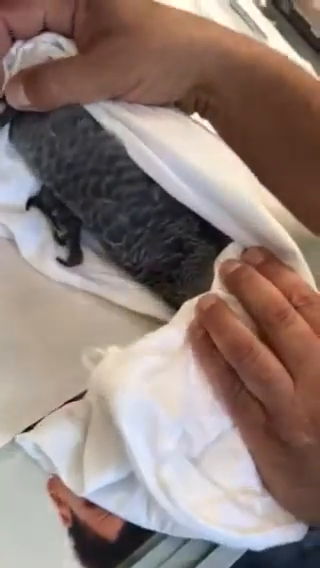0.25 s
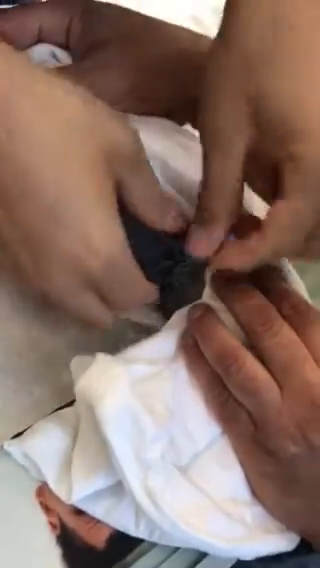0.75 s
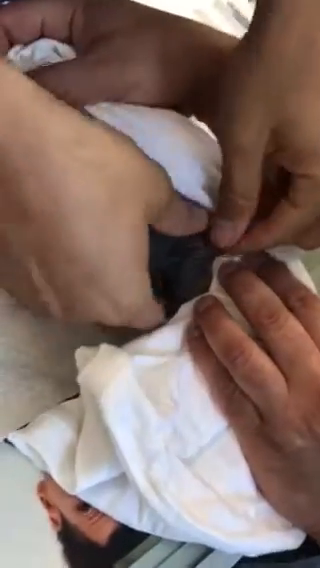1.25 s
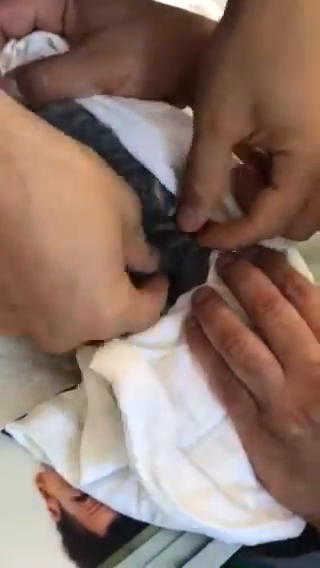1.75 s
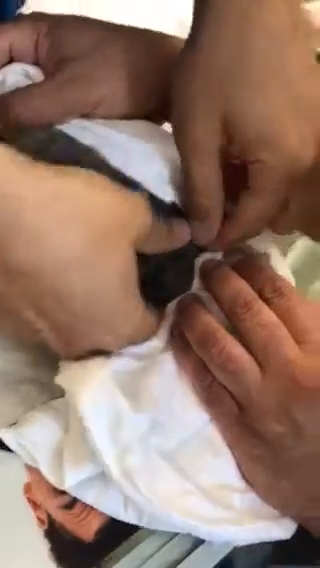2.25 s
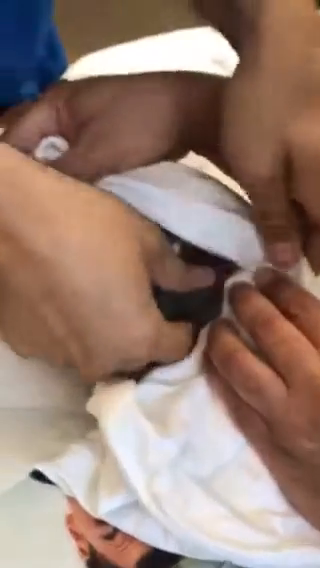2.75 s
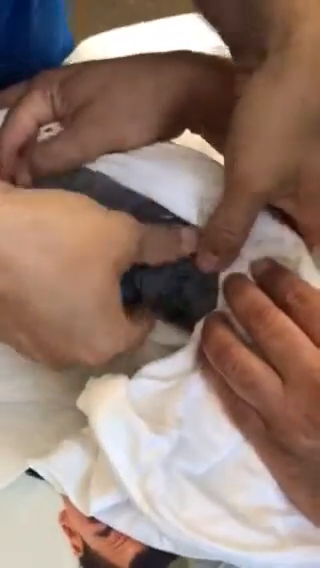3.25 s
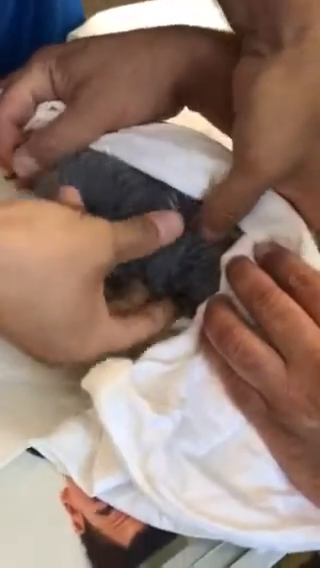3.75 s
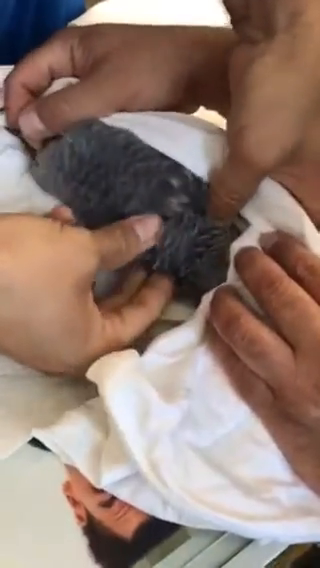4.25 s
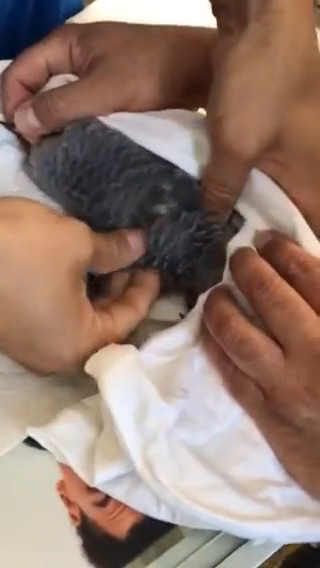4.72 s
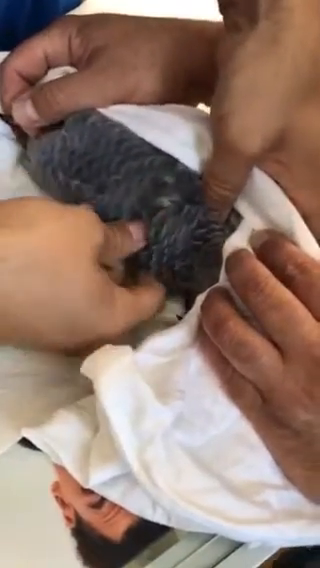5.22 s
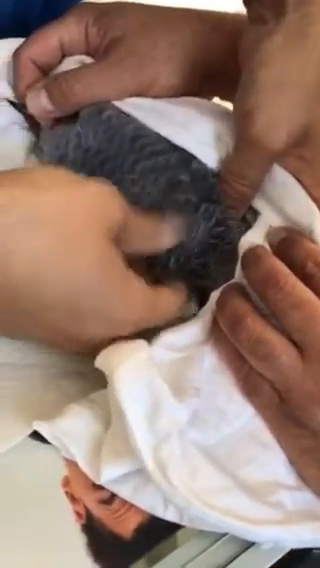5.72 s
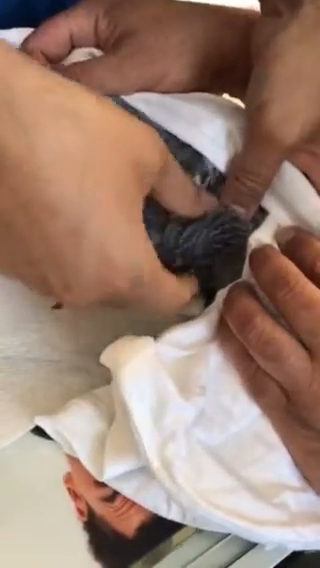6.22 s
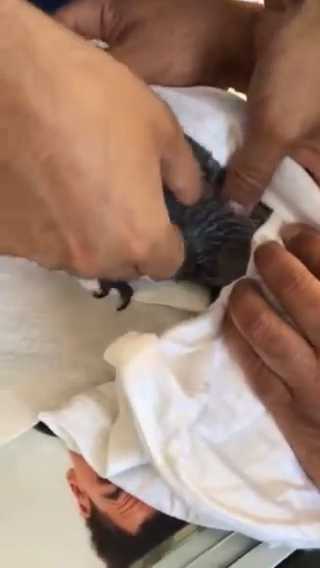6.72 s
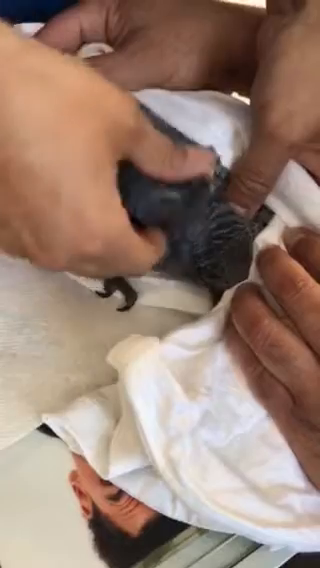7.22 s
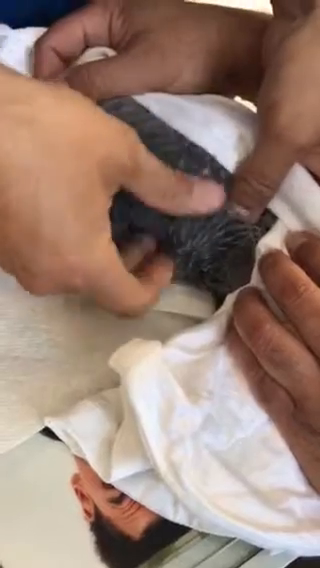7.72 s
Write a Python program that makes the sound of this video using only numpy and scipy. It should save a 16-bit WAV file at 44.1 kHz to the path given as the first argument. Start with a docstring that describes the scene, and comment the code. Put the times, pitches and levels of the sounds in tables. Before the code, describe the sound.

Close raspy parrot growls around a fluttering mid-pitched whistle, with soft cloth rustle and hand bumps, and another bird's sharp squawks behind.

```python
"""A grey parrot wrapped in a towel growls in short harsh calls, close to a phone, while hands feel its neck.
Each growl is a whistle near 930 Hz, modulated by a slow flutter of the syrinx whose pulses ring the throat;
most open with a strong rasp. Soft hisses are noise forced through resonances of the open beak.
Further off, a smaller bird squawks, mostly in pairs, chatters and peeps: harmonic series shaped by its beak.
Coloured noise makes the rustling cloth, the hiss and a low stir; a wavering sine makes the hum."""
import sys
import numpy as np
from scipy import signal
from scipy.fft import rfft, irfft
from scipy.io import wavfile
from scipy.ndimage import uniform_filter1d, map_coordinates

SR = 44100
rng = np.random.default_rng(int(sys.argv[2]) if len(sys.argv) > 2 else 0)


def master_out(mix):
    """Clip the mix to full scale and print it as 16-bit PCM to the path in sys.argv[1]."""
    frames = np.transpose(np.atleast_2d(mix))
    ceiling = np.clip(frames, -1, 1)
    pcm = np.round(ceiling * 32767).astype(np.int16)
    wavfile.write(sys.argv[1], SR, pcm)


N = 351477
TIME = np.arange(N) / SR  # s
TOP_HZ = 15900  # upper edge of the sound
REST_HZ = 930  # whistle pitch at which the throat and mouth resonances are stated


def undb(db):
    """A level in decibels is an amplitude ratio of ten to the power dB / 20."""
    return 10 ** (np.asarray(db) / 20)


def unit(x):
    """Dividing by the root mean square brings a sound to rms 1."""
    return x / np.sqrt(np.mean(x ** 2))


def over_hz(points, hz):
    """Interpolate (Hz, value) points linearly over log frequency, the scale of pitch."""
    f, value = np.transpose(points)
    return np.interp(np.log(np.maximum(hz, 1)), np.log(f), value)


def colour(x, points):
    """Linear filtering multiplies a spectrum by a gain curve, given as (Hz, dB) points; the result has rms 1."""
    hz = np.fft.rfftfreq(len(x), 1 / SR)
    gain = undb(over_hz(points, hz))
    return unit(irfft(rfft(x) * gain, len(x)))


def resonate(x, hz, width):
    """A damped resonator passes a band of the given width in Hz, with gain 1 at its centre."""
    b, a = signal.iirpeak(hz, hz / width, fs=SR)
    return signal.lfilter(b, a, x)


def ring(x, modes):
    """Parallel resonators (Hz, width Hz, dB) of alternating sign add up to a formant spectrum, at rms 1."""
    total = 0
    for k, (hz, width, db) in enumerate(modes):
        total = total + (-1) ** k * undb(db) * resonate(x, hz, width)
    return unit(total)


def wander(rate, size=N):
    """Smoothly interpolated random values give a slow fluctuation: rate values a second, spread near 1."""
    at = np.arange(size) * rate / SR
    values = rng.standard_normal(int(at[-1]) + 3)
    return map_coordinates(values, [at], order=2, mode="nearest")


def swells(table):
    """Half-sine envelopes make amplitudes that rise and fall, from rows of start s, length s and peak dB."""
    total = 0
    for start, length, db in table:
        total = total + undb(db) * np.sin(np.pi * np.clip((TIME - start) / length, 0, 1))
    return total


def room(x, first_s=.006, build_s=.012):
    """Diffuse reverberation is exponentially decaying noise; decay times differ by band, shortest at the ends."""
    # Reverberation time. Each row: frequency in Hz, time to decay by 60 dB in seconds.
    decay_times = [(200, 0.15), (1000, 0.38), (5000, 0.25), (9000, 0.25), (15000, 0.19)]
    t = TIME[:SR // 2]
    spectrum = rfft(rng.standard_normal(len(t)))
    hz = np.fft.rfftfreq(len(t), 1 / SR)
    band = np.round(2 * np.log2(np.maximum(hz, 100) / 100))  # half octaves
    tail = 0
    for b in np.unique(band):
        t60 = over_hz(decay_times, hz[band == b].mean())
        tail = tail + irfft(spectrum * (band == b), len(t)) * np.exp(-np.log(1000) * t / t60)
    build = np.clip((t - first_s) / build_s, 0, 1)
    response = unit(tail * build) / np.sqrt(len(t))  # total energy 1
    return signal.fftconvolve(x, response)[:N]


def background(hiss_waver_db=3, flicker_db=3, hum_waver_db=2):
    """Filtered noise makes a hiss and a low settling stir; a frequency-modulated sine makes an appliance's hum."""
    # Spectrum of the hiss. Each row: frequency in Hz, relative spectral level in dB per Hz.
    ambience = [(25, -6.5), (70, 4), (150, -5.5), (220, -3), (450, -21), (800, -14), (1500, -19.5),
                (2200, -22), (3000, -8.5), (4300, -3.5), (6000, -7.5), (7200, -20), (11000, -27),
                (16000, -30)]
    # Spectrum of the low stir. Each row: frequency in Hz, relative spectral level in dB per Hz.
    stir_colour = [(30, -9.5), (75, 6.5), (130, -6), (220, 1.5), (480, -14.5), (1200, -15), (1360, -3.5),
                   (1500, -12), (2500, -18), (8000, -26), (16000, -28)]
    hiss_db, hum_db, hum_hz = -55.5, -65.5, 118  # levels and pitch about which each wavers
    stir_start_db, stir_fall_db_per_s = -55, 2.04
    hiss_gain = undb(hiss_db + hiss_waver_db * wander(8.9))
    hiss = hiss_gain * colour(rng.standard_normal(N), ambience)
    stir_db = stir_start_db - stir_fall_db_per_s * TIME + flicker_db * wander(13)
    stir = undb(stir_db) * colour(rng.standard_normal(N), stir_colour)
    hum_phase = 2 * np.pi * np.cumsum(hum_hz * (1 + 0.01064 * wander(2.3))) / SR
    hum = undb(hum_db + hum_waver_db * wander(1.4)) * np.sqrt(2) * np.sin(hum_phase)
    return hiss + stir + hum


def cloth_rub(grain_db=3.0):
    """Friction is noise of uneven, fine-grained amplitude: fingers stroke the towel and feathers."""
    # Strokes of the fingers. Each row: start in seconds, length in seconds, peak level added in dB.
    strokes = [(0, 0.26, -47), (.53, 0.2, -51.5), (.76, 0.14, -59.5), (.98, 0.4, -50.5),
               (2.65, 0.17, -53.5), (3.4, 0.86, -60.5), (6.54, 0.19, -53)]
    # Spectrum of the rubbing. Each row: frequency in Hz, relative spectral level in dB per Hz.
    cloth = [(300, -8.5), (750, -22.5), (950, -1.5), (1500, -12), (2000, -0.5), (4500, -2.5), (6800, -11),
             (9000, -14.5), (12000, -21.5), (16000, -23)]
    touch_db = -63.5  # steady light rubbing, to which the strokes add
    grains = rng.standard_normal(N) * undb(grain_db * wander(300))
    return (undb(touch_db) + swells(strokes)) * colour(grains, cloth)


def knocks():
    """An impact is a decaying burst of force that excites a heavily damped resonance: soft knocks of the hands."""
    # Knocks. Each row: start in seconds, peak level in dB, pitch in Hz, decay of the push by 60 dB in seconds.
    bumps = [(.214, -24, 2230, 0.023), (.465, -45, 75, 0.18), (.59, -47, 62, 0.16),
             (1.862, -48, 585, 0.019), (1.945, -43.5, 498, 0.012), (2.035, -50, 85, 0.14),
             (2.285, -46, 109, 0.2), (3.292, -43, 116.8, 0.15), (3.35, -40, 120, 0.081),
             (5.516, -41, 597, 0.055), (5.767, -53, 400, 0.055), (7.302, -52, 90, .12)]
    out = np.zeros(N)
    t = TIME[:SR // 4]
    for start, db, hz, t60 in bumps:
        push = rng.standard_normal(len(t)) * np.exp(-np.log(1000) * t / t60)
        knock = resonate(resonate(push, hz, 2 * hz), hz, 2 * hz)
        first = int(start * SR)
        out[first:first + len(t)] += undb(db) * knock / np.abs(knock).max()
    return out


def notes(table, beak, scoop, sag, jitter, hiss_db, swell, crack):
    """A beak filters a harmonic source; roughness perturbs pitch and partials, and adds subharmonics and hiss."""
    out = np.zeros(N + SR)
    for start, length, pitch_hz, db, rough in table:
        size = int(length * SR)
        u = np.linspace(0, 1, size)
        # the pitch scoops up to its top and sags at the end; the voice cracks at both ends
        arch = 1 - scoop * (1 - u) ** 5 - sag * u ** 6
        rough = rough + crack * (u ** 4 + (1 - u) ** 5 / 3)
        hz = pitch_hz * arch * (1 + jitter * rough * wander(900, size))
        phase = 2 * np.pi * np.cumsum(hz) / SR
        # alternating strong and weak cycles add lines halfway between the harmonics
        halfway_db = 20 * np.log10(np.clip(rough, .01, 1)) - 2
        tone = 0
        for k in np.arange(2, 25) / 2:
            line_db = over_hz(beak, k * hz) + 3 * wander(120, size) + (k % 1 > 0) * halfway_db
            line = np.sin(k * phase + rng.uniform(0, 2 * np.pi))
            tone = tone + undb(line_db) * (k * hz < TOP_HZ) * line
        hiss = rough * undb(hiss_db) * colour(rng.standard_normal(size), beak)
        envelope = np.abs(np.sin(np.pi * u)) ** swell
        first = int(start * SR)
        out[first:first + size] += undb(db) * unit(unit(tone) + hiss) * envelope
    return out[:N]


def peeps():
    """A nearly pure tone has little energy above its fundamental: the smaller bird's soft peeps."""
    # Peeps. Each row: start in seconds, length in seconds, top pitch in Hz, level before the arch in dB,
    # roughness from 0 to 1.
    peep_rows = [(2.564, 0.031, 2910, -46, 0.1), (2.66, .028, 3180, -52, .05),
                 (3.103, 0.0345, 2775, -45.5, 0.9), (5.38, 0.024, 3250, -49, 0),
                 (5.748, 0.037, 2770, -54.5, 0.23), (6.468, 0.05, 2820, -58.5, 0),
                 (7.28, 0.038, 5460, -50.5, 0)]
    # Beak response. Each row: frequency in Hz, relative gain in dB.
    peep_beak = [(2900, 12.5), (5800, -4), (8700, 2), (11500, -40), (15000, -35)]
    return notes(peep_rows, peep_beak, scoop=0.16, sag=0, jitter=.03, hiss_db=0, swell=.5, crack=0)


def chatter():
    """Very short tones have broad spectra and sound like clicks of pitch: the smaller bird's chatter."""
    # Chatter notes. Each row: start in seconds, length in seconds, top pitch in Hz, level before the arch in dB,
    # roughness from 0 to 1.
    chatter_rows = [(5.123, 0.014, 1940, -42.5, 0.65), (5.138, 0.014, 2270, -32.5, 0.07),
                    (5.157, 0.0076, 2350, -33, 0.18), (5.166, 0.02, 2330, -47, 0.6),
                    (5.19, 0.014, 2920, -50, 0.1), (5.208, 0.0091, 2505, -34, 0.26),
                    (5.22, 0.01, 2500, -46, 0.1), (5.233, 0.0069, 2340, -37.5, 0),
                    (7.882, 0.014, 1790, -33, 0.44), (7.898, 0.014, 2040, -31, 0.3),
                    (7.918, 0.009, 1630, -28, 0.18), (7.939, 0.0084, 1510, -35, 0.5),
                    (7.961, 0.016, 1670, -38, 0.9)]
    # Beak response. Each row: frequency in Hz, relative gain in dB.
    chatter_beak = [(1500, -3.5), (2400, 6.5), (3800, 6), (4700, 5.5), (7000, -3), (9000, -10.5),
                    (12000, -15), (15500, -56)]
    return notes(chatter_rows, chatter_beak, scoop=.04, sag=.03, jitter=.07, hiss_db=-3, swell=.6, crack=.1)


def squawks():
    """Formants strengthen high harmonics of an arched tone that turns rough at its ends: the squawks."""
    # Squawks. Each row: start in seconds, length in seconds, top pitch in Hz, relative level before the arch
    # in dB, roughness from 0 to 1 before the cracks at the ends.
    squawk_rows = [(.112, 0.071, 1347, -23, 0.01), (.25, 0.067, 1337, -24.5, 0.41),
                   (1.171, 0.069, 1319, -25.5, 0.56), (2.2, 0.077, 1340, -25.5, 0.37),
                   (2.35, 0.067, 1300, -24.5, 0.46), (3.817, 0.064, 1319, -23, 0.01),
                   (3.971, 0.063, 1312, -24, 0.16), (5.942, 0.069, 1340, -24, 0.65),
                   (6.082, 0.055, 1334, -24, 0.41), (6.888, 0.07, 1320, -25, 0.8),
                   (7.479, 0.066, 1365, -23, 0.32), (7.629, 0.074, 1339, -24.5, 0.5)]
    # Beak response. Each row: frequency in Hz, relative gain in dB.
    squawk_beak = [(1300, -26.5), (2600, -15), (3900, -3), (4600, -4), (5240, 3), (5800, -0.5), (6550, -1),
                   (8000, -9.5), (9300, -12), (12000, -14), (13300, -16.5), (15500, -27.5)]
    return notes(squawk_rows, squawk_beak, scoop=.17, sag=.15, jitter=.026, hiss_db=-6, swell=1.45, crack=2.5)


def beak_hiss(air):
    """Turbulent air excites the resonances of the narrow beak; a high-pass filter takes away the bass."""
    # Passages of the open beak. Each row: frequency in Hz, width in Hz, relative gain in dB.
    beak_modes = [(2500, 360, 2.5), (4260, 660, 4.5), (5300, 1300, -2), (6820, 600, -3.5), (8660, 360, -8),
                  (9700, 180, -11.5), (11600, 790, -15)]
    high_pass = signal.butter(4, 2100, "high", fs=SR, output="sos")
    return unit(signal.sosfilt(high_pass, ring(air, beak_modes)))


def hisses(flicker_db=2):
    """Turbulence without voicing is pure noise: soft, uneven swells of air through the parrot's beak."""
    # Hoarse hisses. Each row: start in seconds, length in seconds, peak level before the flicker in dB.
    hiss_rows = [(3.003, 0.16, -47.5), (4.08, 0.2, -35), (4.28, 0.25, -40.5), (4.842, 0.23, -56.5),
                 (7.326, 0.19, -45.5)]
    return swells(hiss_rows) * beak_hiss(rng.standard_normal(N)) * undb(flicker_db * wander(50))


def side_tones(pulses, phase, modes):
    """Modulation makes side tones one flutter rate apart around the whistle, weighted by the resonances."""
    total = 0
    for hz, width, db in modes:
        # the resonance is placed by its distance from the whistle, then moves with it
        pole = np.exp((2j * np.pi * (hz - REST_HZ) - np.pi * width) / SR)
        ringing = signal.lfilter([1], np.poly([pole, pole]), pulses)
        total = total + undb(db) * (1 - abs(pole)) ** 2 * ringing
    return unit(np.real(total * np.exp(1j * phase)))


def syrinx(row, t, tremble_db=1.18):
    """Driving effort governs level, pitch and brightness together; rasp at the ends slows the flutter."""
    # Effort: the bird bears down (+) or lets up (-). Each row: peak time in seconds,
    # half-width of the bell curve (to 1/e) in seconds, effort in dB.
    pushes = [(1.601, 0.037, 8), (1.72, 0.039, 6.5), (2.118, 0.045, 10.5), (3.155, .03, -8),
              (3.232, 0.023, 2), (3.297, 0.02, -6), (4.193, 0.04, 10), (4.632, 0.053, 3.5),
              (4.779, 0.034, -13), (5.932, .012, 5), (5.97, 0.015, -6.5), (6.224, 0.111, 7),
              (7.751, 0.02, -8)]
    bright_db_per_db, sag_hz_per_db = 0.85, 4  # effort brings out overtones and presses the pitch down
    lift_s, lift_rasp = .1, 1.2  # pitch climbs as the air runs out; rasp added per share of climb
    rasp_settle_s, rasp_return_s = .11, .03  # the opening rasp clears, and comes back at the close
    held_rasp, closing_rasp = .14, .5  # shares 0-1; effort steadies the held voice
    flutter_start_hz, rasp_slows_hz, flutter_sag_hz_per_s = 210, 21.87, 22
    attack_s, edge_db = 0.02, -32.5  # a growl rises from this far below its level and falls back to it
    start, length, release, pitch_hz, db, swell_db, overtones_db, opening_rasp, lift = row
    age = np.maximum(t - start, 0)
    left = np.maximum(start + length - t, 0)
    effort_db = swell_db * (age / length - .5) + tremble_db * wander(33.9, len(t))
    for peak, width, push_db in pushes:
        effort_db = effort_db + push_db * np.exp(-((t - peak) / width) ** 2)
    edges = np.maximum(1 - age / attack_s, 0) ** 2 + np.maximum(1 - left / release, 0) ** 2
    level_db = db + effort_db + edge_db * edges
    climb = lift * np.exp(-left / lift_s)
    hz = pitch_hz * (1 + climb) - sag_hz_per_db * effort_db
    bright_db = overtones_db + bright_db_per_db * effort_db
    held = np.minimum(held_rasp * undb(-effort_db), .5) + lift_rasp * climb
    rasp = held + (opening_rasp - held) * np.exp(-(age / rasp_settle_s) ** 2)
    rasp = np.clip(rasp + (1 - rasp) * closing_rasp * np.exp(-left / rasp_return_s), 0, 1)
    flutter_hz = flutter_start_hz - rasp_slows_hz * rasp - flutter_sag_hz_per_s * age
    return hz, level_db, bright_db, flutter_hz, rasp


def growl(row, shimmer_db=2, octave_db=0, third_db=-12, buzz_db=2, mouth_db=1, chest_db=-15,
          strain_db=-24, strain_growth=1.0):
    """Flutter modulates a whistle in amplitude and frequency; its pulses ring the throat and let out puffs."""
    # Throat at the rest pitch. Each row: frequency in Hz, width of each of two equal poles in Hz, relative gain in dB.
    throat = [(775.3, 106, -2), (931, 53, 1), (1187, 226, 4)]
    # Mouth at the rest pitch, in the same columns: Hz, Hz, dB.
    mouth = [(1410.5, 120, 8), (1892, 120, 1.5), (2083, 275, -0.5), (2942, 100, -7)]
    # Chest, which stays at its own pitch. Each row: frequency in Hz, width in Hz, relative gain in dB.
    chest = [(224.2, 94, -1), (400, 664, 0.37), (513, 415, 0.72)]
    # Spectrum of air rushing through the throat. Each row: frequency in Hz, relative spectral level in dB per Hz.
    air_colour = [(150, -29), (220, -8), (300, -8.5), (420, -19), (580, -22), (800, 10.5), (1400, -4.5),
                  (2200, -2.5), (2600, -4), (3000, -20), (3600, -8.5), (4900, -30), (8000, -31.5),
                  (16000, -60.5)]
    chop, bend, jitter, waver = .25, .035, .03, .01  # shares of amplitude, pitch, flutter rate and pitch
    air_db, puff = -10, .5  # a puff dies by 1/e in this share of a flutter cycle
    start, length = row[:2]
    first, last = int(start * SR), min(int((start + length) * SR), N)
    t = TIME[first:last]
    size = len(t)
    hz, level_db, bright_db, flutter_hz, rasp = syrinx(row, t)
    bright = undb(np.minimum(bright_db, -5))
    # the flutter grows uneven when the voice is raspy
    turns = np.cumsum(flutter_hz * (1 + jitter * (1 + 4 * rasp) * wander(200, size))) / SR
    cycle = turns % 1
    force = undb(shimmer_db * wander(220, size))
    swing = np.cos(2 * np.pi * (cycle - 1 / 8)) * force
    # each beat pushes the whistle up in level and pitch, so the upper side tones are the stronger
    pitch_waver = (waver + 0.072 * rasp) * wander(150, size)
    phase = 2 * np.pi * np.cumsum(hz * (1 + bend * swing + pitch_waver)) / SR
    # the whistle's own overtones fade quickly as rasp grows
    octave = undb(octave_db) * np.cos(2 * phase + np.pi)
    third = undb(third_db) * np.cos(3 * phase)
    overtones = bright * (1 - rasp) ** 4 * (octave + third)
    whistle = np.sqrt(2 * (1 - rasp)) * (1 + chop * swing) * (np.cos(phase) + overtones)
    pulses = np.diff(np.floor(turns), prepend=0) * force
    throat_buzz = undb(buzz_db) * side_tones(pulses, phase, throat)
    chest_buzz = undb(chest_db) * ring(pulses, chest)
    buzz = np.sqrt(rasp) * (throat_buzz + chest_buzz)
    puffs = rng.standard_normal(size) * np.exp(-cycle / puff) * force
    mouth_buzz = undb(mouth_db) * side_tones(pulses, phase, mouth)
    rush = undb(air_db) * (1 + 2 * rasp) * colour(puffs, air_colour)
    voice = whistle + buzz + bright * (mouth_buzz + rush)
    # whistle and rasp share one air supply: their running power is held even
    voice = voice / np.sqrt(uniform_filter1d(voice ** 2, size=SR // 70))
    # the harder the air pushes, the more the beak hisses
    strain = undb(strain_db + strain_growth * (level_db + 19.5))
    voice = voice + strain * beak_hiss(puffs)
    return np.pad(voice * undb(level_db), (first, N - last))


def growls():
    """Separate calls superpose as pressures: the parrot's growls, each with its own effort and rasp."""
    # Growls. Each row: start in seconds, length in seconds, release in seconds, pitch in Hz before effort and
    # lift, level in dB before effort, swell from start to end in dB, brightness of overtones and mouth in dB
    # before effort, opening rasp from 0 to 1, closing pitch lift as a share.
    calls = [ (1.197, 0.083, 0.035, 907, -35.5, 2, -10.5, 0.7, 0),
             (1.296, 0.49, 0.034, 947, -36, 10.5, -15.5, 0.27, 0.059),
             (2.09, .451, 0.028, 926, -35.5, -5, -9, .92, .24),
             (3.051, 0.076, 0.044, 701, -31.5, 3, -1, 0.82, 0),
             (3.146, 0.4566, 0.046, 926, -29.5, 6.5, -5.5, 0.53, 0.011),
             (3.911, 0.37, 0.038, 947.6, -26.5, 0, -1, .92, 0),
             (4.472, .353, 0.035, 946.5, -31, -0.5, -7, .5, .12),
             (5.912, .475, .06, 946, -38, 0, -15.5, 0.59, .2),
             (6.833, 0.13, 0.069, 818, -28.5, -3.5, -4, .92, 0.082),
             (7.013, 0.047, 0.024, 898, -39.5, -3, -15, 0.04, 0.0056),
             (7.544, 0.27, 0.036, 876, -33, -9.5, -8.5, 0.78, 0.053)]
    return sum(growl(row) for row in calls)


def scene(parrot_room_db=-32, squawk_db=2, squawk_room_db=-1, chatter_room_db=-8):
    """The ratio of direct to reverberant sound tells distance: the near parrot is almost dry, the other bird not."""
    handling = cloth_rub() + knocks()
    small_notes = chatter() + peeps()
    calls = squawks()
    parrot = growls() + hisses()
    to_room = undb(parrot_room_db) * parrot + undb(squawk_room_db) * calls + undb(chatter_room_db) * small_notes
    near = parrot + handling
    far = undb(squawk_db) * calls + small_notes
    return (near + far + room(to_room) + background())[None]


def record(dry):
    """A steep low-pass filter removes the highest treble: the phone cuts the top."""
    return signal.sosfilt(signal.ellip(10, .2, 80, TOP_HZ, fs=SR, output="sos"), dry)


dry = scene()
out = record(dry)
master_out(out)
```